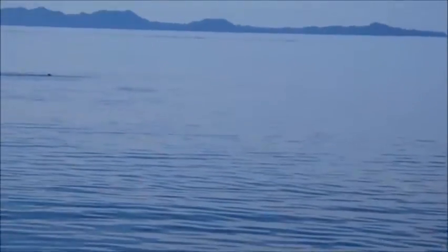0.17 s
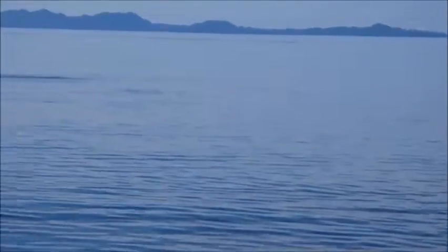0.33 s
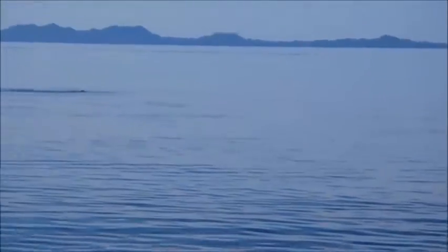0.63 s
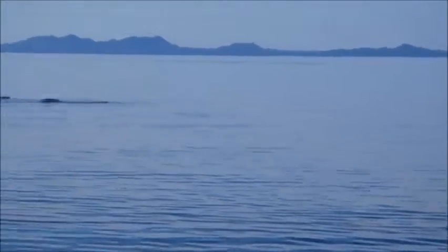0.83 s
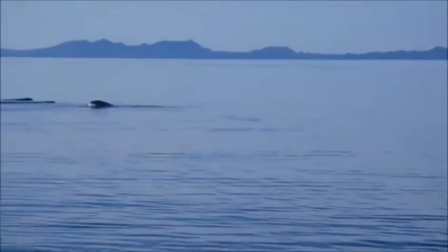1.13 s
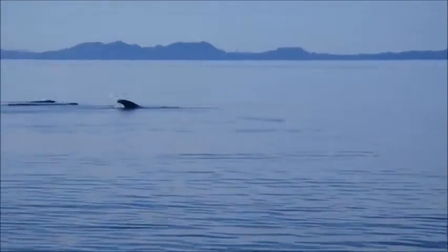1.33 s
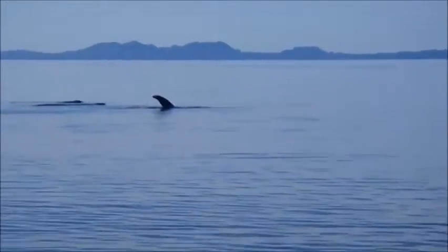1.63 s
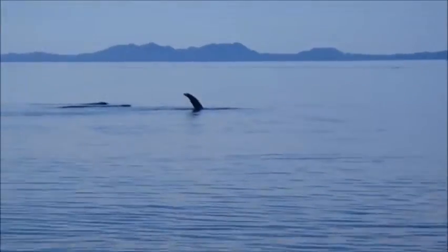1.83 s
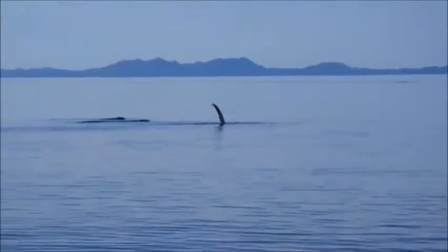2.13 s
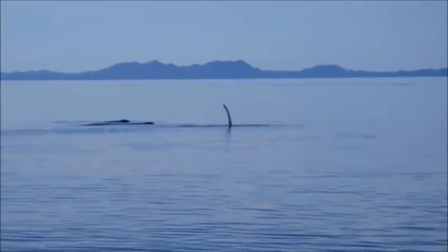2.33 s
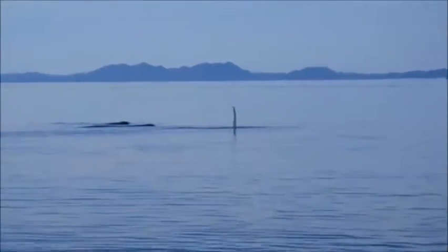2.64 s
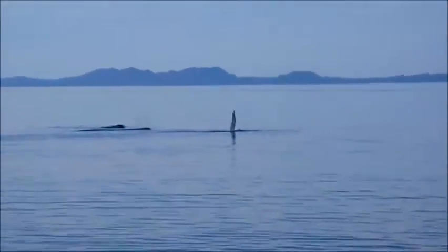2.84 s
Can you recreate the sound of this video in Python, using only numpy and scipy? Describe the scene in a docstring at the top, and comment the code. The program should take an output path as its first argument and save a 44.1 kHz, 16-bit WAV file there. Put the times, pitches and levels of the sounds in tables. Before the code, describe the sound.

A boat engine idles with a low steady throb and pulsing hiss over calm sea wash.

```python
"""A six-cylinder boat engine is heard idling first: tones at multiples of its cycle rate, strongest at
the firing rate and its double, a noise pattern repeated every cycle, and a pulsing treble hiss.
Around it a calm open sea washes steadily, as noise in bands that flicker apart. Light wind buffets
the microphone in short low noise puffs, mostly in the first second; brief resonant laps come later."""
import sys
import numpy as np
from scipy import signal
from scipy.fft import rfft, irfft
from scipy.io import wavfile
from scipy.ndimage import uniform_filter1d, map_coordinates

SR = 44100
rng = np.random.default_rng(int(sys.argv[2]) if len(sys.argv) > 2 else 0)


def to_wav(sig):
    """Store sig (one row per channel, or 1-D mono) as 16-bit WAV at the path in sys.argv[1].

    Samples outside -1..1 are clipped; the rate is SR.
    """
    pcm = np.clip(np.atleast_2d(sig), -1, 1) * 32767
    pcm = np.round(pcm).astype(np.int16)
    wavfile.write(sys.argv[1], SR, pcm.T)  # frames by channels


N = 131859
T = np.arange(N) / SR  # time [s]
FREQ = np.fft.rfftfreq(N, 1 / SR)  # frequency of each spectrum bin [Hz]

CYCLE_HZ, CYLINDERS = 8.85, 6  # each cylinder fires once a cycle
SPEED_WANDER = 0.002975  # rms share of the engine speed


def undb(db):
    """Level law: an amplitude ratio is ten to the power dB / 20."""
    return 10 ** (np.asarray(db) / 20)


def unit(x):
    """Normalization: scale to rms 1."""
    return x / np.sqrt(np.mean(x ** 2))


def noise():
    """White noise: equal mean power at every frequency."""
    return rng.standard_normal(N)


def colour(x, points):
    """Spectral shaping: gain interpolated over log frequency from (Hz, dB) points; rms 1."""
    hz, db = np.array(points, float).T
    f = np.maximum(FREQ, 1)
    gain = undb(np.interp(np.log(f), np.log(hz), db))
    return unit(irfft(rfft(x) * gain, N))


def resonance(hz, width_hz):
    """Resonance: noise through a squared second-order band-pass response; rms 1."""
    f = np.maximum(FREQ, 1)
    detuning = (f - hz * hz / f) / (2 * width_hz) * np.sqrt(2)
    return unit(irfft(rfft(noise()) / (1 + 1j * detuning) ** 2, N))


def walk(rate):
    """Slow random modulation: random steps at this rate [Hz], averaged twice; rms 1."""
    k = max(int(SR / rate), 1)
    steps = np.repeat(noise()[:N // k + 1], k)
    smooth = uniform_filter1d(uniform_filter1d(steps, k), k)
    return unit(smooth[:N])


def swell(at, length):
    """Gaussian envelope: peak 1 at its centre [s], length [s] as standard deviation."""
    return np.exp(-.5 * ((T - at) / length) ** 2)


# Engine tones: (multiple of the cycle rate, level [dB rms])
ENGINE_TONES = [(6, -34), (9, -47.5), (12, -36), (15, -59), (18, -55), (21, -58), (30, -58), (36, -60.5),
                (39, -59.5), (62, -60.5), (68, -65), (74, -63), (146, -69), (163, -73)]
HUM_WAVER_DB, OVERTONE_WAVER_DB = 0.42, 2.5  # rms level waver


def hum(turn):
    """Harmonic series: tones locked to the cycle, wavering more above twice the firing rate."""
    out = 0
    for multiple, db in ENGINE_TONES:
        k = round(multiple)
        waver_db = HUM_WAVER_DB if k <= 2 * CYLINDERS else OVERTONE_WAVER_DB
        level = undb(db + waver_db * walk(7))
        tone = np.cos(2 * np.pi * (k * turn + rng.random()))
        out = out + level * np.sqrt(2) * tone
    return out


# Spectrum of the engine clatter: (frequency [Hz], relative density [dB per Hz])
CLATTER_SPECTRUM = [(30, -22), (60, 4.5), (150, -1.5), (230, -7), (290, -8.5), (340, -8), (440, -16),
                    (800, -12.5), (1100, -24), (1300, -16.5), (1600, -25), (2500, -32), (5000, -51)]
CLATTER_DB, CLATTER_SCATTER_DB = -43.5, 0.5  # overall level; rms drift of strength


def clatter(turn):
    """Periodic noise: one rattle recurs every cycle, its strength drifting at the firing rate."""
    size = int(SR / CYCLE_HZ)
    pattern = rng.standard_normal(size)
    rattle = map_coordinates(pattern, [turn % 1 * size], order=1, mode="grid-wrap")
    strength = undb(CLATTER_SCATTER_DB * walk(CYCLE_HZ * CYLINDERS))
    return undb(CLATTER_DB) * colour(rattle * strength, CLATTER_SPECTRUM)


# Spectrum of the broad hiss: (frequency [Hz], relative density [dB per Hz])
HISS_SPECTRUM = [(1500, -35), (2500, -7), (2900, 1), (3400, 3), (4000, 1.5), (4400, 1.5), (4800, -2.5),
                 (5200, -11), (6000, -19.5), (8000, -32)]
# Course of the broad hiss: (time [s], level [dB])
HISS_COURSE = [(0, -53), (.35, -48.5), (.62, -52), (.85, -50.5), (1.05, -52), (1.5, -51), (2.1, -52.5),
               (2.6, -52), (2.8, -50.5), (2.96, -48.5)]
# Swells of the narrow resonance: (time [s], added level [dB], length [s])
RESONANCE_SWELLS = [(0.157, 8.5, .028), (.36, 4, 0.024), (0.506, 5.5, .04), (.69, 7.5, .045),
                    (0.983, 2.5, 0.039), (1.134, 7, 0.036), (1.876, 6, 0.045), (2.033, 5, 0.031),
                    (2.274, 4.5, 0.049), (2.5, 3.5, 0.042), (2.654, 4, 0.024)]
HISS_PULSE, HISS_FLICKER_DB = 0.11, 0.88  # pulse depth as a share; rms level flicker
RING_HZ, RING_WIDTH_HZ, RING_DB = 3638, 320, -57  # resonance, with its level between swells


def hiss(turn):
    """Amplitude modulation: the engine pulses a broad hiss and a resonance that comes and goes."""
    shaft = 2 * turn  # two shaft turns to a cycle
    half_firing = np.cos(2 * np.pi * turn * CYLINDERS / 2)
    twice_shaft = np.cos(2 * np.pi * 2 * shaft)
    pulse = 1 + HISS_PULSE * (half_firing + twice_shaft) / 2
    times, levels = np.array(HISS_COURSE).T
    broad_db = np.interp(T, times, levels) + HISS_FLICKER_DB * walk(60)
    broad = undb(broad_db) * colour(noise(), HISS_SPECTRUM)
    ring_db = RING_DB + sum(db * swell(at, length) for at, db, length in RESONANCE_SWELLS)
    ring = undb(ring_db) * resonance(RING_HZ, RING_WIDTH_HZ)
    return pulse * (broad + ring)


def panel():
    """Narrow-band resonance: a faint steady ringing in the boat."""
    return undb(-63) * resonance(hz=1297, width_hz=30)


# Spectrum of the sea wash: (frequency [Hz], relative density [dB per Hz])
WASH_SPECTRUM = [(20, -1), (50, 10.5), (100, 6.5), (170, 3.5), (260, 0.5), (350, -1), (450, -4),
                 (750, -5.5), (1300, -7), (1650, -10.5), (2100, -12), (2500, -16.5), (3200, -27.5),
                 (5000, -25.5), (6500, -29), (9000, -30), (14500, -31.5)]
WASH_DB, WASH_SWELL_DB, WASH_FLICKER_DB = -42, -0.62, 0.58  # level; rms shared swell; rms per band


def wash():
    """Independent band modulation: overlapping octave bands of noise flicker apart, swelling together."""
    spectrum = rfft(colour(noise(), WASH_SPECTRUM))
    octave = np.log2(np.clip(FREQ, 50, 6400) / 50)  # octaves above 50 Hz
    bands = 0
    for k in range(8):
        share = np.maximum(1 - abs(octave - k), 0)  # triangular crossfade between bands
        bands = bands + irfft(spectrum * share, N) * undb(WASH_FLICKER_DB * walk(12.1))
    return bands * undb(WASH_DB + WASH_SWELL_DB * walk(2.8))


# Wind puffs: (time [s], level [dB], length [s])
WIND_PUFFS = [(0.087, -36.5, 0.019), (0.372, -30.5, 0.018), (.45, -38, 0.017), (0.572, -31.5, 0.021),
              (0.797, -43, 0.054), (0.936, -33, 0.022), (1.036, -37, 0.03), (1.48, -41, .02),
              (1.914, -39, .022)]
# Spectrum of a puff: (frequency [Hz], relative density [dB per Hz])
PUFF_SPECTRUM = [(20, -18), (50, -9.5), (100, 3.5), (170, -6), (240, -12), (400, -24.5), (1000, -61)]


def wind():
    """Gated low-frequency noise: short puffs of wind on the microphone."""
    envelope = sum(undb(db) * swell(at, length) for at, db, length in WIND_PUFFS)
    return colour(noise(), PUFF_SPECTRUM) * envelope


# Water laps: (time [s], level [dB], centre [Hz], width [Hz], length [s])
WATER_LAPS = [(1.31, -43.5, 4610, 550, 0.0017), (2.274, -45, 964, 160, 0.0085),
              (2.282, -43.5, 347, 110, 0.024), (2.422, -51.5, 4700, 450, 0.0059)]


def laps():
    """Transient resonance: each small lap is a brief burst of band-limited noise."""
    out = 0
    for at, db, hz, width_hz, length in WATER_LAPS:
        out = out + undb(db) * swell(at, length) * resonance(hz, width_hz)
    return out


def scene():
    """Superposition: engine, sea and wind add at the rail of the boat."""
    speed_hz = CYCLE_HZ * (1 + SPEED_WANDER * walk(4))
    turn = np.cumsum(speed_hz) / SR  # engine cycles elapsed
    engine = hum(turn) + clatter(turn) + hiss(turn) + panel()
    return (engine + wash() + wind() + laps())[None]


def record(dry):
    """Low-pass filtering: the recorder's steep elliptic response cuts the top."""
    low_pass = signal.ellip(10, .2, 80, 14250, fs=SR, output="sos")  # ripple, stop [dB]; edge [Hz]
    return signal.sosfilt(low_pass, dry)


dry = scene()
out = record(dry)
to_wav(out)
```